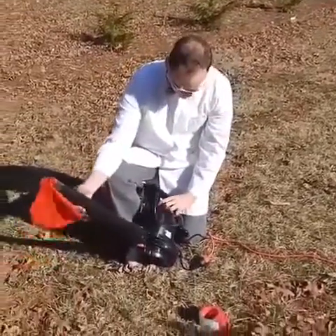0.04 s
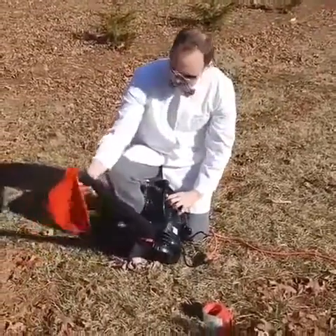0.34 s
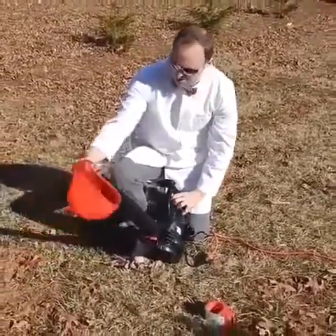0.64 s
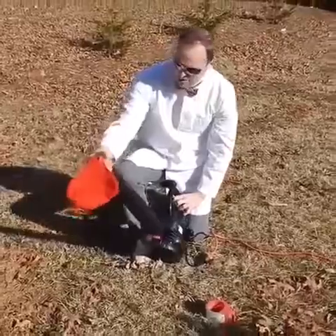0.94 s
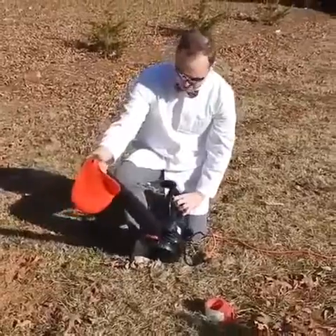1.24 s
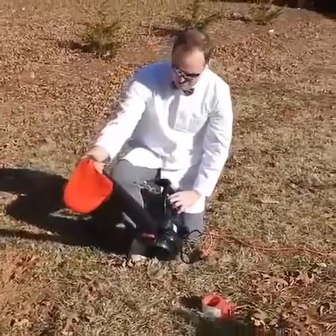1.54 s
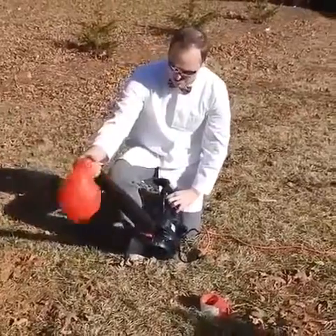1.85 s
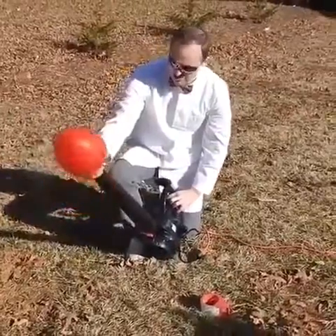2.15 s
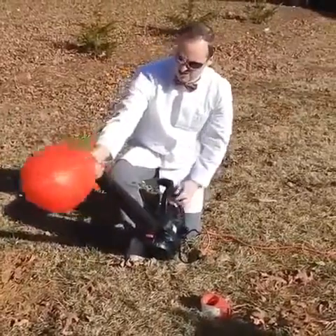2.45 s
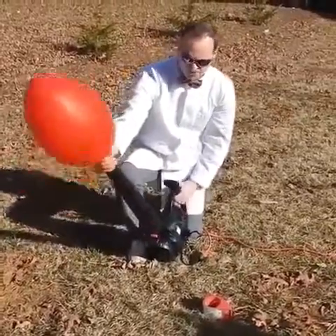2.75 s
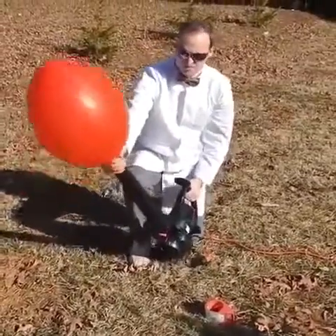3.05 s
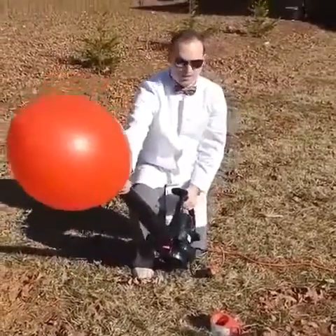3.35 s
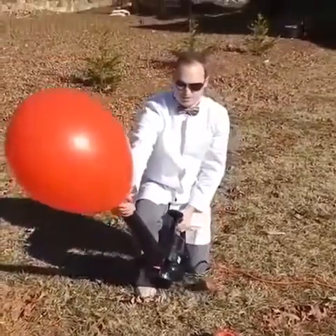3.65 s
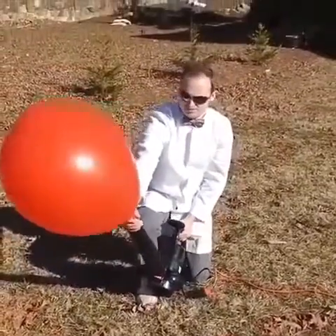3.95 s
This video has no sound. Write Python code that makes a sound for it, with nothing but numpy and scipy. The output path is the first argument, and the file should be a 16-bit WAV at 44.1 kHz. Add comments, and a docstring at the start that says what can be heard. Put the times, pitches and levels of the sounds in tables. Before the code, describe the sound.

An electric blower is the main sound. Outdoors, a limp rubber balloon first rustles and ticks faintly over a low rumble. Then a switch clacks and the motor winds up to a steady whine with loud rushing air.

```python
"""Outdoors, over a faint rumble, a limp rubber balloon rustles softly on the nozzle of an electric blower.
A thin rising whistle sounds, the rubber ticks twice, and a second whistle follows.
Then the motor starts: the switch clacks, and pulses of mains current make it hum and growl.
It winds up to a steady whine as its fan sings and air rushes through the tube into the balloon."""
import sys
import numpy as np
from scipy import signal
from scipy.fft import rfft, irfft
from scipy.io import wavfile
from scipy.ndimage import uniform_filter1d

SR = 44100
rng = np.random.default_rng(int(sys.argv[2]) if len(sys.argv) > 2 else 0)


def wav_record(signal):
    """Record a signal, one row per channel, as 16-bit PCM in the file named by sys.argv[1]."""
    frames = np.transpose(np.atleast_2d(signal))
    bounded = np.clip(frames, -1, 1)
    # unit amplitude maps onto the largest positive 16-bit level
    quanta = np.round(bounded * 32767).astype(np.int16)
    wavfile.write(sys.argv[1], SR, quanta)


N = 176400  # 4 seconds

# tone colour of the outdoor background (frequency [Hz], relative level [dB])
OUTDOOR_COLOUR = [(25, -21), (50, -7), (70, -1), (95, 1), (135, -6), (200, -6.5), (280, -11.5), (420, -19),
                  (800, -18), (1200, -19), (1800, -24.5), (2500, -36), (4000, -40), (6000, -45.5),
                  (9600, -49.5)]
# loudness of the background (time [s], rumble [dB], distant hush [dB])
OUTDOOR_LOUDNESS = [(0, -59, -55.5), (.18, -56, -51), (.43, -47, -53), (.74, -48.5, -53),
                    (1.09, -48, -53.5), (1.28, -54, -53), (1.41, -47.5, -54), (1.58, -49, -53.5)]
# rubber sliding in the hand (middle time [s], half length [s], level [dB])
RUBBER_RUSTLES = [(0.047, 0.14, -65), (.27, 0.071, -64), (0.45, 0.065, -62.5), (0.612, 0.068, -60)]
# thin whistles, perhaps a small bird (start [s], length [s], from [Hz], to [Hz], level [dB])
WHISTLE_GLIDES = [(0.243, 0.13, 6370, 6900, -75), (1.307, .2, 5800, 7750, -72)]
# rubber ticks; the last two merge into one (time [s], relative level [dB], fade time [s], ring [Hz])
RUBBER_TICKS = [(1.1022, -36.5, 0.00094, 7400), (1.2263, -33, 0.00042, 8800), (1.2294, -50, .0025, 8200)]
# magnetic growl of the starting motor (multiple of the slot rate [x], relative level [dB])
GROWL_TONES = [(1, -27), (2, -35), (3, -34)]
# where the motor's plastic case rings (frequency [Hz], width [Hz], gain [dB])
CASE_RINGS = [(310, 90, 0), (668, 160, -7), (930, 310, -5.5), (1550, 95, -3.5), (2350, 85, 4),
              (2730, 280, -6.5), (3340, 200, -13)]
# sharp resonances that the motor's buzz climbs through (frequency [Hz], width [Hz], gain [dB])
BUZZ_RINGS = [(1545, 75, -20.5), (2340, 90, -30), (2566, 55, -25)]
# loudness of the four fan blade tones (time [s], first [dB], second [dB], third [dB], fourth [dB])
BLADE_LOUDNESS = [(1.7, -79, -54, -76, -85), (1.9, -56, -41, -65, -75), (1.96, -50, -32, -60, -69),
                  (2.02, -41, -24.5, -61, -74), (2.12, -26.5, -28.5, -54, -64), (2.22, -31, -17, -62, -61),
                  (2.41, -22.5, -18, -58, -59), (2.51, -27.5, -25, -45, -56), (2.72, -30, -32.5, -39, -47),
                  (2.96, -37, -53, -39.5, -51), (3.25, -32, -31.5, -32.5, -45),
                  (3.5, -31.5, -32.5, -32.5, -46), (4.0, -37.5, -34, -35.5, -50)]
# tones that come in near full speed (multiple of the shaft rate [x], level at full speed [dB])
FULL_SPEED_TONES = [(1, -30), (3, -59), (30, -45)]
# tone colour of the air in the fan and tube (frequency [Hz], relative level [dB])
AIR_COLOUR = [(30, -30), (70, -18.5), (115, -23.5), (165, 0.5), (235, -1), (300, 2), (385, -5.5),
              (470, -0.5), (590, -5), (700, 0), (800, -6), (930, -3), (1090, -5), (1300, -9), (1600, -2),
              (1850, -6.5), (2200, -5), (2600, -13.5), (2950, -7.5), (3300, -14.5), (3650, -8.5),
              (3970, -25), (4200, -12), (5000, -18), (5700, -13.5), (6500, -15.5), (8500, -19), (9600, -19)]
# loudness of the rushing air (time [s], bass [dB], middle [dB], treble [dB])
AIR_LOUDNESS = [(1.6, -57.5, -72, -77), (1.68, -45, -43.5, -58), (1.78, -38, -40.5, -47.5),
                (1.92, -25.5, -31, -37), (2.08, -24, -25, -30), (2.24, -23.5, -23, -26.5),
                (2.38, -22, -21.5, -25.5), (2.529, -27, -26, -30), (2.79, -26, -24.5, -25.5),
                (3.02, -25.5, -24.5, -28), (3.35, -27.5, -23, -26.5), (3.75, -27, -25, -28.5),
                (4.0, -27, -26, -29.5)]
# tone colour of the gust that opens the balloon (frequency [Hz], relative level [dB])
FLAP_COLOUR = [(25, -19), (60, -9), (120, 0), (250, -8), (600, -47)]

START_S, SPINUP_S, SHAFT_HZ = 1.62, .347, 207.5  # SHAFT_HZ: turns per second at full speed
BLADES, SLOTS = 6, 12  # blades on the fan, slots in the motor's spinning core
MAINS_HZ, CURRENT_PEAK_S = 60, 1.7555


def undb(db):
    """Turn decibels into a number to multiply by."""
    return 10 ** (np.asarray(db) / 20)


def unit(x):
    """Scale a signal to an average strength (rms) of 1."""
    return x / np.sqrt(np.mean(x ** 2) + 1e-20)


def gains(table, t):
    """One loudness curve over time for each dB column of a table."""
    rows = np.array(table, float)
    return [undb(np.interp(t, rows[:, 0], col)) for col in rows[:, 1:].T]


def wander(hz):
    """A smooth random wobble of size about 1, with hz new values a second."""
    hold = int(SR / hz)
    steps = np.repeat(rng.standard_normal(N // hold + 1), hold)
    return 1.3 * uniform_filter1d(uniform_filter1d(steps, hold), hold)[:N]


def noise(colour, lo_hz=0, hi_hz=SR):
    """Noise with the given tone colour, kept between two frequencies."""
    hz, points = np.arange(N // 2 + 1) * SR / N, np.array(colour, float)
    shape = undb(np.interp(np.log(hz + 1), np.log(points[:, 0]), points[:, 1]))
    return unit(irfft(rfft(rng.standard_normal(N)) * shape * (hz >= lo_hz) * (hz < hi_hz), N))


def ring(x, hz, width_hz):
    """A resonance: it lets through the sound near one frequency."""
    return signal.lfilter(*signal.iirpeak(hz, hz / width_hz, fs=SR), x)


def outdoors(t, split_hz=300):
    """An uneven low rumble lies under a distant hush."""
    rumble_gain, hush_gain = gains(OUTDOOR_LOUDNESS, t)
    rumble = rumble_gain * undb(1.3 * wander(12)) * noise(OUTDOOR_COLOUR, 0, split_hz)
    return rumble + hush_gain * noise(OUTDOOR_COLOUR, split_hz)


def rubber(t):
    """The limp balloon rustles in the hand and ticks on the nozzle."""
    slide = sum(undb(db) * np.exp(-((t - at) / half) ** 2) for at, half, db in RUBBER_RUSTLES)
    out = slide * undb(3 * wander(90.7)) * unit(ring(rng.standard_normal(N), 10000, 9400))
    for at, db, fade_s, hz in RUBBER_TICKS:
        snap = (t >= at) * np.exp(-np.abs(t - at) / fade_s) * rng.standard_normal(N)
        body = undb(-3) * ring(snap, hz=2800, width_hz=2500)
        out = out + 2 * undb(db) * (ring(snap, hz, 3300) + body)
    return out


def whistles(t):
    """Faint whistles waver as they slide upward."""
    out = 0
    for at, length, from_hz, to_hz, db in WHISTLE_GLIDES:
        along = np.clip((t - at) / length, 0, 1)
        hz = (from_hz + (to_hz - from_hz) * along) * (1 + .008 * wander(35) + .019 * wander(700))
        swell = undb(db + 6 * wander(59)) * np.sqrt(8 * along * (1 - along))
        out = out + swell * np.sin(2 * np.pi * np.cumsum(hz) / SR)
    return out


def mains(t):
    """The cycle of the wall socket's power, 1 at each pulse of current."""
    return np.cos(2 * np.pi * MAINS_HZ * (t - CURRENT_PEAK_S))


def motor_case(x, top_hz=3460):
    """The plastic case rings and muffles the treble."""
    body = sum(undb(db) * ring(x, hz, width) for hz, width, db in CASE_RINGS)
    return signal.sosfilt(signal.butter(4, top_hz, fs=SR, output="sos"), body)


def motor(t, angle, hum_hz=317, surge_end_s=1.91):
    """Current pulses make the slots growl, then buzz; the brushes scrape and the fixed coils hum."""
    since = np.maximum(t - START_S, 0)
    current = unit(np.exp(2 * mains(t)))
    rise = np.minimum(since / .13, 1)
    surge = rise ** 2 * np.exp(-np.maximum(t - surge_end_s, 0) / .06)  # extra current at the start
    slot_angle = SLOTS * angle
    slot_tones = sum(undb(db + 2 * wander(40)) * np.sin(multiple * slot_angle + .56 * wander(300))
                     for multiple, db in GROWL_TONES)
    growl = motor_case(surge * current * slot_tones)
    scrape = unit(motor_case(np.sqrt(current) * rng.standard_normal(N)))
    brushes = undb(-44) * np.clip((since - .025) / .044, 0, 1) * scrape
    hum_swell = np.minimum(since / .055, 1) * np.exp(-since / .079)
    hum = undb(-32.5 + 2.2 * wander(30)) * hum_swell * np.sin(2 * np.pi * hum_hz * t)
    shake = rise * current * np.cos(slot_angle + .29 * wander(150))
    buzz = sum(undb(db) * ring(shake, hz, width) for hz, width, db in BUZZ_RINGS)
    return np.sqrt(2) * (growl + hum + buzz) + brushes


def fan(t, speed, angle, flutter_db=.7, rasp=.22):
    """The passing blades sing, roughened by swirls of incoming air; the shaft adds its own tones."""
    out, levels = 0, gains(BLADE_LOUDNESS, t)
    throb = np.clip(1.2 * (1 - speed), 0, 1)
    levels[1] *= 1 + throb * mains(t)  # the second tone throbs until the motor is up to speed
    for multiple, gain in enumerate(levels, 1):
        swirls = undb(flutter_db * wander(45)) * (1 + rasp * wander(230.8))
        out = out + gain * swirls * np.sin(multiple * BLADES * angle + .32 * wander(40))
    for multiple, db in FULL_SPEED_TONES:
        gain = undb(db + 2 * wander(12)) * speed ** 13.3
        out = out + gain * np.sin(multiple * angle + .42 * wander(16))
    return np.sqrt(2) * out * (t > START_S)


def air(t, flicker_db=(1, 1, 1.03), gust_s=1.93):
    """Air tumbles through the fan and tube; its first gust flaps the limp rubber open."""
    bands_hz = [(0, 600), (600, 2500), (2500, SR)]  # bass, middle, treble
    rush = sum(gain * undb(db * wander(22.04)) * noise(AIR_COLOUR, *band)
               for gain, db, band in zip(gains(AIR_LOUDNESS, t), flicker_db, bands_hz))
    gust = undb(-40) * np.exp(-((t - gust_s) / .068) ** 2) * noise(FLAP_COLOUR, 0, 600)
    return rush * (t > START_S) + gust


def switch(t, at_s=1.6595, fade_s=.008):
    """The switch snaps into place with a small plastic clack."""
    fade = (t >= at_s) * np.exp(-np.abs(t - at_s) / fade_s)
    plastic = ring(ring(rng.standard_normal(N), 1800, 3050), 1800, 3050)
    return undb(-40) * fade * unit(plastic)


def scene():
    """Add up all the sounds; one shaft, easing up to full speed, drives both fan and motor."""
    t = np.arange(N) / SR
    speed = 1 - np.exp(-(np.maximum(t - START_S, 0) / SPINUP_S) ** 1.08)  # 0 is still, 1 is full speed
    angle = 2 * np.pi * np.cumsum(SHAFT_HZ * speed * (1 + .0005 * wander(6))) / SR
    blower = fan(t, speed, angle) + motor(t, angle) + switch(t) + air(t)
    return (blower + rubber(t) + whistles(t) + outdoors(t))[None]


def record(dry):
    """Cut the treble steeply above 9750 Hz."""
    return signal.sosfilt(signal.ellip(12, .2, 80, 9750, fs=SR, output="sos"), dry)


dry = scene()
out = record(dry)
wav_record(out)
```